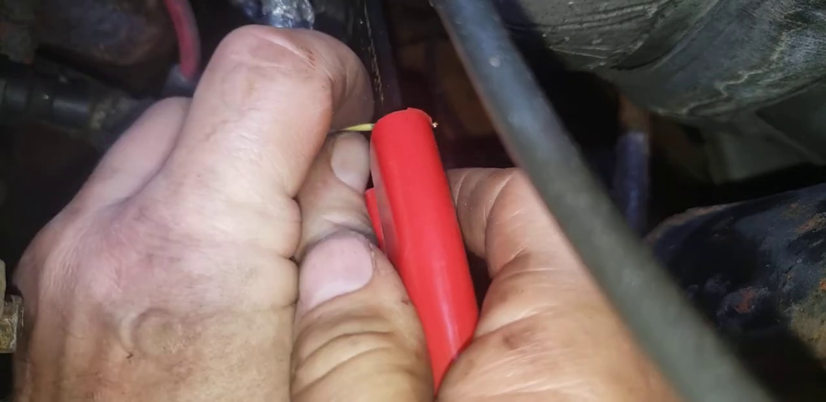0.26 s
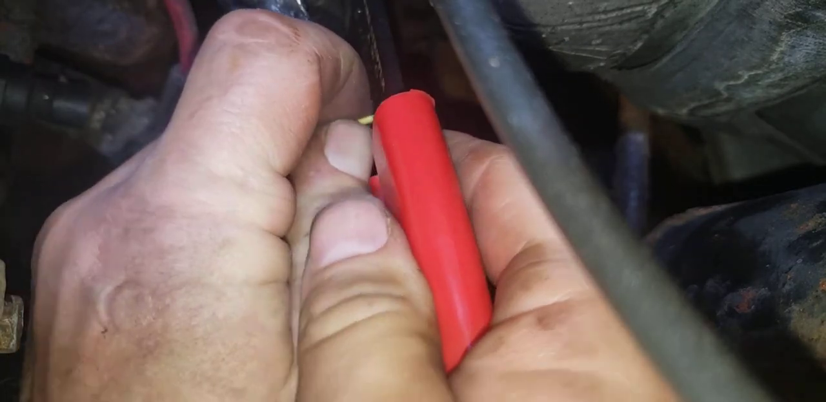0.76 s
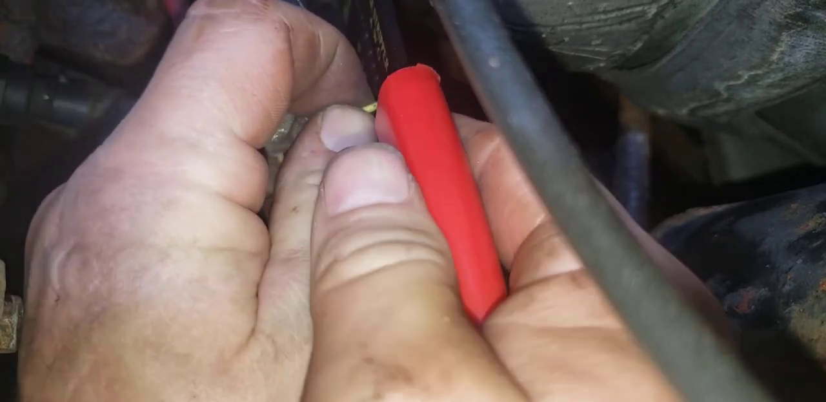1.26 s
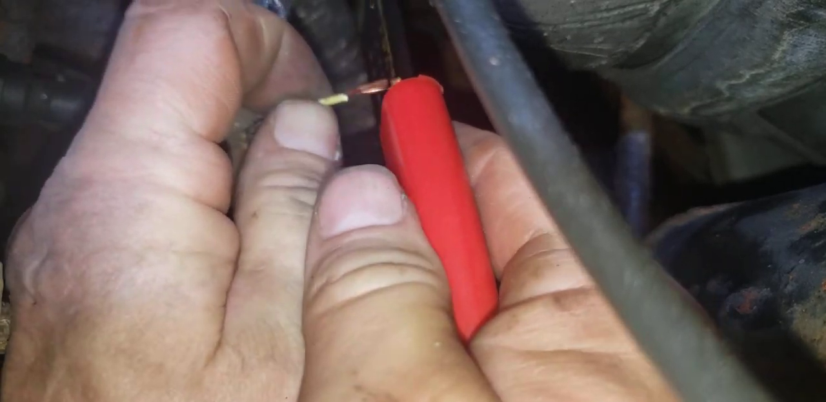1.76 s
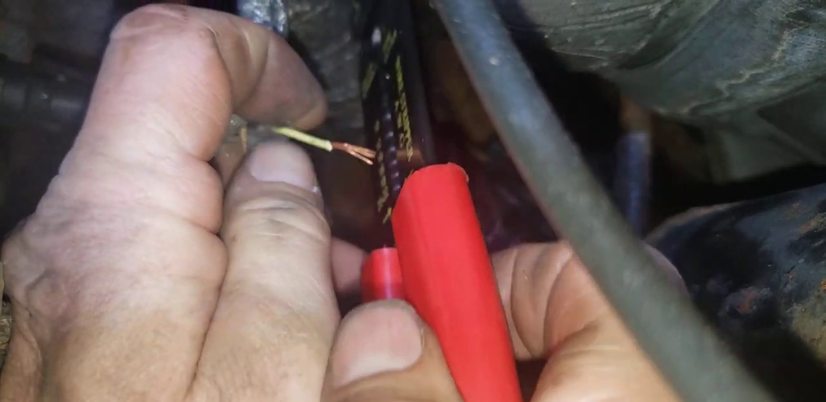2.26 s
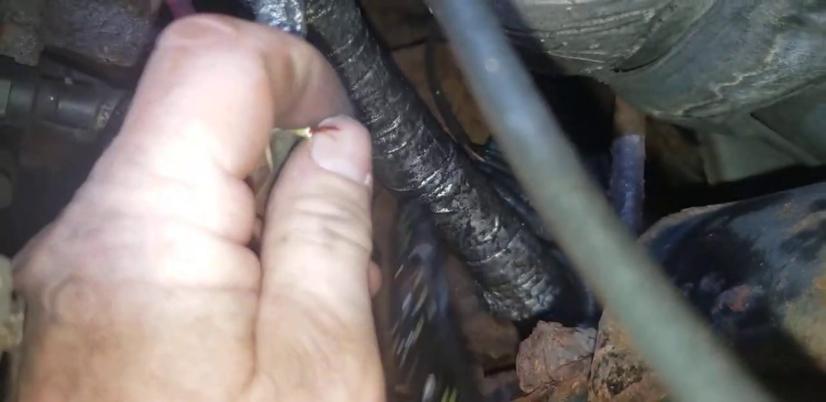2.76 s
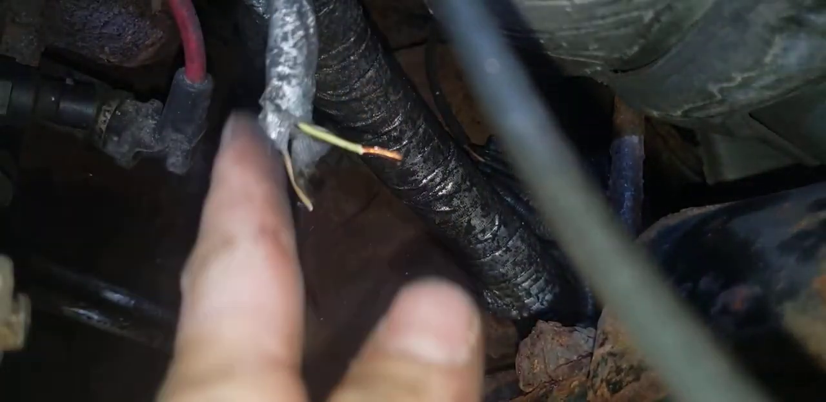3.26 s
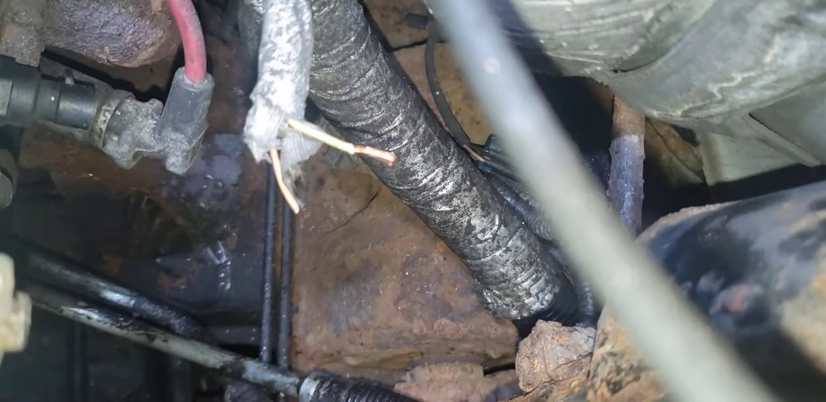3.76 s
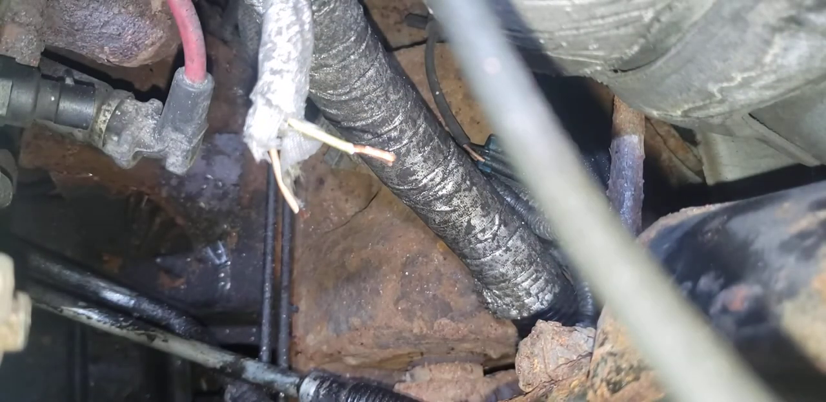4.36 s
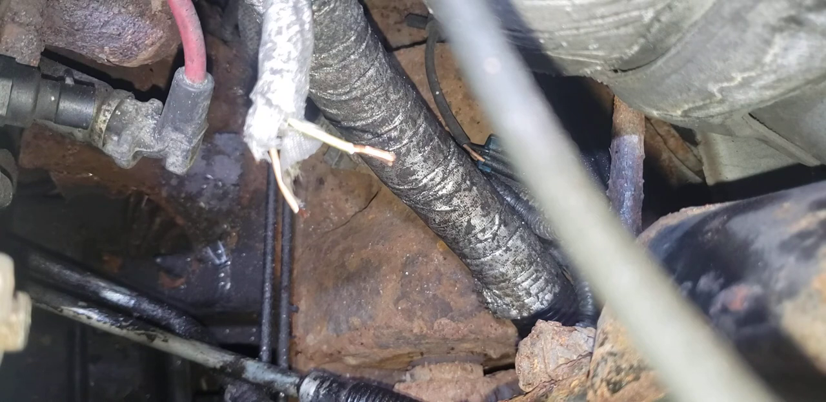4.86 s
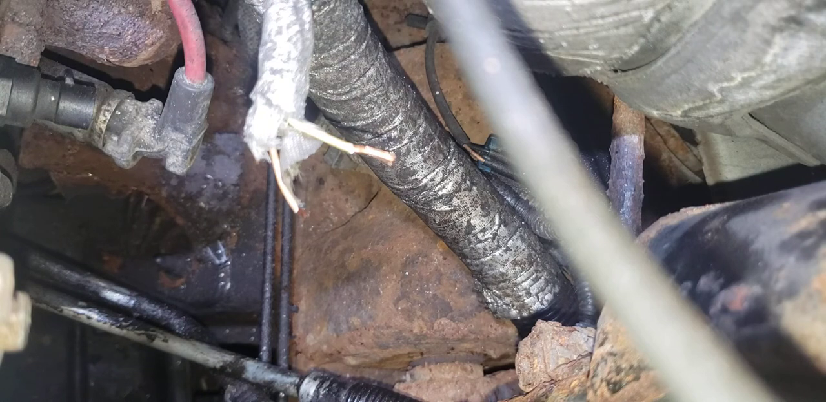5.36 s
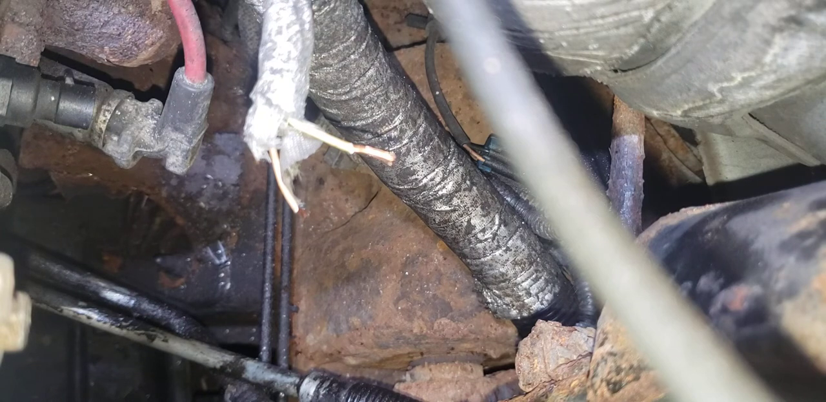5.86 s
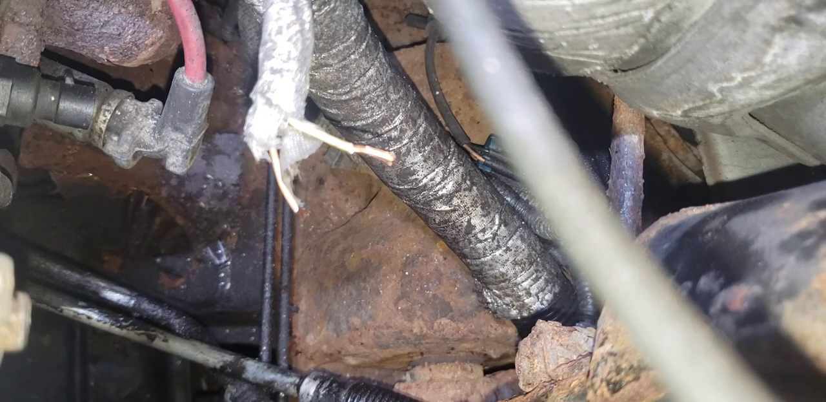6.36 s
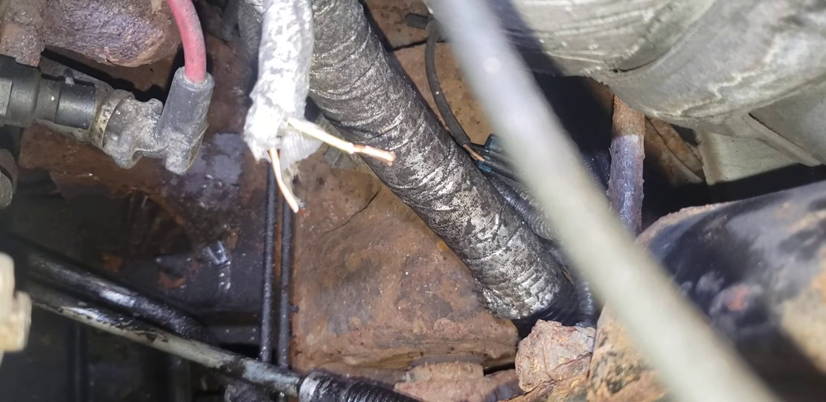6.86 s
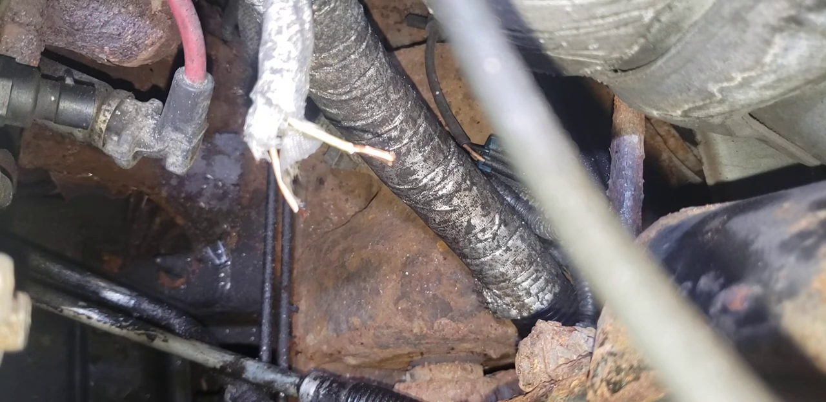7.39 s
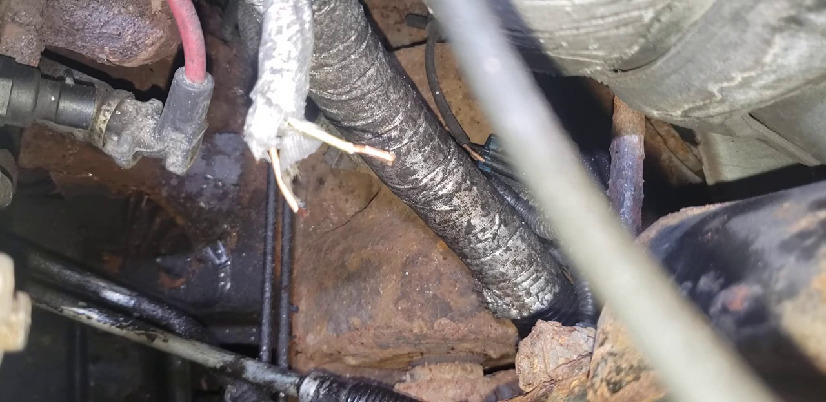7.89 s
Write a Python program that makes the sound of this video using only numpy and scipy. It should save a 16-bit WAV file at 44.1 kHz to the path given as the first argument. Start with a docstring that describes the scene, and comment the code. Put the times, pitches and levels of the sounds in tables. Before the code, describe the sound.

Close, gritty scrapes and sharp little snaps as a tool strips a thin wire, then skin brushing, light ticks and a few hard knocks over low rumble.

```python
"""Stripping a wire in an engine bay

A hand wire stripper bites a thin wire and drags the insulation off, close by: uneven slips, sharp catches
and a few rubbery squeaks. The hand brushes away with airy noise, over low soft thumps and a hollow drone.
Small ticks and a few knocks come from the right as the tool is put down: short noise bursts, the knocks
with ringing tones. A low rumble and a faint hiss, both filtered noise, fill the garage."""
import sys
import numpy as np
from scipy import signal
from scipy.io import wavfile
from scipy.ndimage import uniform_filter1d

SR = 44100
rng = np.random.default_rng(int(sys.argv[2]) if len(sys.argv) > 2 else 0)


def persist_wave(psi):
    """Save psi, clipped to +-1, as 16-bit WAV."""
    counts = np.round(np.clip(psi, -1, 1) * 32767).astype(np.int16)
    wavfile.write(sys.argv[1], SR, np.atleast_2d(counts).T)


N = 358533

# bass, middle and treble: (lowest f/Hz, highest f/Hz)
BANDS = [(110, 900), (900, 7000), (7000, 17000)]
# tone colour of the jaws on the insulation: (f/Hz, left level/dB, right level/dB)
SCRAPE_COLOUR = [(146, 8.5, -17), (318, -1, 2), (433, -5.5, -5), (565, -1.5, 1), (833, -8.5, -10),
                 (1260, -5.5, -8), (1740, -10.5, -7.5), (3100, -15.5, -18), (3900, -21, -12),
                 (4450, -11, -17.5), (5160, -25.5, -11), (7000, -25.5, -30.5), (8330, -20.5, -31.5),
                 (15700, -22.5, -30.5)]
TIME = np.arange(N) / SR
RING_TIME = TIME[:SR // 3]


def amp(db):
    """Turns decibels into gain."""
    return 10 ** (np.asarray(db) / 20)


def evened(x):
    """Scales a sound to rms 1."""
    return x / np.sqrt(np.mean(x ** 2) + 1e-20)


def packed(x):
    """Scales a blow to the energy of 20 ms at rms 1."""
    return evened(x) * np.sqrt(SR / 50 / x.shape[-1])


def add(mix, s, sound):
    """Mixes a stereo sound in at time s."""
    part = mix[:, max(round(s * SR), 0):][:, :sound.shape[1]]
    part += sound[:, :part.shape[1]]


def read(points, hz):
    """Reads the left and right dB of a colour at the given frequencies."""
    f, *sides = np.transpose(points)
    return np.array([np.interp(np.log(hz + 1), np.log(f + 1), side) for side in sides])


def level(curve):
    """Gain along a level curve, practically silent outside it."""
    s, db = np.transpose(curve)
    return amp(np.interp(TIME, s, db, left=-120, right=-120))


def band(x, edges, order=3):
    """Keeps the frequencies between two edges, without looking ahead in time."""
    return signal.sosfilt(signal.butter(order, edges, "band", fs=SR, output="sos"), x)


def coloured(x, points, peaks=(), size=4096):
    """Gives a sound a left and a right spectrum, lifted at narrow resonances."""
    hz = abs(np.fft.fftfreq(size, 1 / SR))
    lifts = sum(lift / (1 + (2 * (hz - f) / width) ** 2) for f, width, lift in peaks)
    db = read(points, hz) + lifts
    # minimum phase: the filter responds as early as it can
    response = np.exp(np.conj(signal.hilbert(np.log(amp(db)))))
    taps = np.fft.ifft(response).real[:, :size // 2]
    return signal.oaconvolve(x, taps, axes=1)[:, :x.shape[1]]


def resonate(x, hz, width):
    """Passes a sound through one fixed resonance."""
    return signal.lfilter(*signal.iirpeak(hz, hz / width, SR), x)


def pair(length, same):
    """Left and right noise; same is how alike they are, from 0 to 1."""
    a, b = rng.standard_normal((2, length))
    same = np.clip(same, -1, 1)
    return np.array([a, same * a + np.sqrt(1 - same ** 2) * b])


def drift(seconds):
    """A smooth random wander of rms 1."""
    width = max(int(seconds * SR), 2)
    once = uniform_filter1d(rng.standard_normal(N), width)
    return evened(uniform_filter1d(once, width))


def stroke(s, hold, attack, release):
    """Gain of one rubbing movement: it swells up to time s, holds, and dies away."""
    fallen = np.maximum((s - TIME) / attack, (TIME - s - hold) / release)
    return np.exp(-np.clip(fallen, 0, 20))


def fading_noise(t, same, rise, t60):
    """Noise that swells over rise seconds while fading by 60 dB every t60 seconds."""
    return pair(len(t), same) * (1 - np.exp(-t / rise)) * np.exp(-np.log(1000) * t / t60)


def blow(levels_db, ring_hz, colour, t60s, rises, same, ring_width, ring_db):
    """A contact scattered by the crowded bay: three bands, each with its own swell and fade, and a pitch."""
    out = 0
    for edges, db, t60, rise, alike in zip(BANDS, levels_db, t60s, rises, same):
        scatter = fading_noise(RING_TIME, alike, rise, t60)
        scatter = scatter + amp(ring_db) * resonate(scatter, ring_hz, ring_width)
        out = out + amp(db) * packed(band(coloured(scatter, colour), edges))
    return out


def crackle(pitches, slips_per_s, same):
    """Many contact spots slip at random, each with its own pitch, echoes and busy moments."""
    t, out = RING_TIME[:SR // 100], 0
    busy = drift(.02)
    for hz in pitches:
        at = np.flatnonzero(rng.random(N) < slips_per_s / len(pitches) / SR)
        sign = rng.choice([-1, 1], len(at))
        size = np.minimum(rng.exponential(1, len(at)), 3)
        # every spot follows the same busy and idle moments, shifted in time
        busy_here = busy[at - rng.integers(N)]
        slips = np.zeros(N)
        slips[at] = sign * amp(2.5 * size + 3 * busy_here)
        echoes = pair(len(t), same) * np.exp(-t / .0013)
        grain = evened(echoes + 3 * resonate(echoes, hz, hz / 5))
        out = out + signal.oaconvolve(slips[None], grain, axes=1)[:, :N]
    return evened(out)


def scrape(slips_per_s=1700, body_db=-2.0, treble_db=-2, same=0.35, low_hz=330):
    """The insulation sticks and slips in the jaws: clumps of uneven slips over a faint smooth rub."""
    # resonances of the tool and the gap between the hands: (f/Hz, width/Hz, lift/dB)
    jaw_peaks = [(602.3, 39, 6), (1281, 27, 9), (1604, 147, 8), (1996, 71, 8.5), (2595, 114, 10),
                 (3110, 54, 13), (4160, 47, 11), (4720, 57, 10.5), (5220, 50, 9), (8830, 300, 7)]
    # strokes of the jaws: short bites have sharp edges, twists swell slowly, the last drags hold
    # (t/s, hold/s, level/dB before body_db, treble against that level/dB before treble_db, edge/s)
    pulls = [(0.1, .018, -65, 14.5, .002), (0.1172, 0.0017, -29, -10, 0.0029),
             (0.365, 0.015, -43, -9.5, 0.0092), (0.537, .012, -43.5, -14, .002),
             (0.556, 0.028, -39.5, -11, 0.0067), (0.603, 0.014, -46, -10, 0.012),
             (0.821, 0.014, -39, -11.5, 0.035), (0.899, .012, -44.5, -12, 0.0016),
             (1.002, 0.03, -46.5, -5.5, 0.0054), (1.048, 0.0077, -38, -10, .012),
             (1.128, 0.014, -58.5, -17, .008), (1.251, 0.029, -44.5, -6.5, .025),
             (1.414, 0.025, -48, -3.5, 0.023), (1.6, 0.033, -42, -9, 0.015),
             (1.632, 0.011, -29.5, -12.5, 0.0084), (1.643, 0.028, -37, -9, 0.028),
             (1.75, 0.027, -41.5, -12, 0.006), (1.832, .1, -46.5, -10, 0.045),
             (1.917, 0.021, -40.5, -12.5, 0.026), (2.018, 0.024, -40, -17, 0.011),
             (2.051, 0.028, -40, -8.5, 0.0012), (2.083, 0.14, -54.5, -10, 0.012),
             (2.196, .13, -45, -8.5, .007), (2.344, 0.11, -42, -9, 0.0084),
             (2.445, 0.039, -37.5, -6, 0.0061)]
    let_go_s = 0.0026  # a stroke's dying away takes this much longer than its swell
    # the grip creaks faintly for as long as the tool is on the wire
    grip_until_s, grip_fade_s = 2.58, 0.035
    grip_db, grip_treble_db = -70, -2.5  # before body_db and treble_db; treble is against the grip

    drive = crackle(np.geomspace(600, 9000, 16), slips_per_s, same) + .5 * pair(N, same)
    rub = coloured(drive, SCRAPE_COLOUR, jaw_peaks)
    body = band(rub, (low_hz, BANDS[1][1])) / np.std(band(rub, BANDS[1]))
    treble = evened(band(rub, BANDS[2]))
    force = amp(grip_db) * stroke(0, grip_until_s, grip_fade_s, grip_fade_s)
    bright = amp(grip_treble_db) * force
    # the strongest movement of the moment sets the level
    for s, hold, db, bright_db, edge in pulls:
        pull = amp(db) * stroke(s, hold, edge, edge + let_go_s)
        force = np.maximum(force, pull)
        bright = np.maximum(bright, amp(bright_db) * pull)
    return amp(body_db) * force * body + amp(treble_db) * bright * treble


def snaps(gain_db=-1):
    """The jaws catch and let go: short noise bursts with a strong pitch of contact."""
    # (t/s, level/dB before gain_db, bass and treble against that level/dB, pitch of the contact f/Hz)
    catches = [(0.092, -49.5, -2, -9, 4300), (0.1148, -46, -13, 3, 1770), (0.1173, -56, 11, -12, 1900),
               (0.5512, -36.5, 1.5, -16, 1620), (0.579, -43, 3.5, -26, 1385), (0.613, -48, 2, -19, 1520),
               (0.897, -50, -2, -20, 2580), (1.006, -51, -16, 7, 5000), (1.627, -32.5, -6, -9.5, 1620),
               (1.6388, -42.5, 12.5, -13, 1290), (1.752, -53.5, 7, 8, 1620), (1.809, -48, 4, -31, 1540),
               (1.919, -40, -6, -13, 1380), (1.942, -54, 15, 4, 1420), (2.054, -38, 0.5, -5, 1320),
               (2.269, -51.5, 7, 3.5, 2730), (2.288, -55, 9.5, 8.5, 5800), (2.361, -48, 3, -11, 2100),
               (2.4543, -49, 13.5, 6.5, 5740), (2.487, -44.5, 5, -16, 2640)]
    t60s, rises_s, same = (.07, .04, .025), (.0012, .0006, .0004), (.8, .3, .2)  # bass, middle, treble
    out = np.zeros((2, N))
    for s, db, bass_db, treble_db, ring_hz in catches:
        levels_db = (db + bass_db, db, db + treble_db)
        catch = blow(levels_db, ring_hz, SCRAPE_COLOUR, t60s, rises_s, same, ring_width=60, ring_db=19.0)
        add(out, s, catch)
    return amp(gain_db) * out


def squeak(overtones=((1, 0), (1.45, -8), (2, -15), (2.7, -25)), sag_per_s=6):
    """The sleeve slides off in a few rubbery slips, each sagging in pitch; overtones: (ratio, level/dB)."""
    # slips of the sleeve as it leaves the strands:
    # (t/s, lowest tone's peak level on the left/dB, its mid-slip pitch f/Hz, time from peak to 1/e/s)
    slips = [(1.7076, -34.5, 630, 0.0026), (1.718, -22.5, 628, 0.0051), (1.727, -35, 585, 0.0065)]
    out = np.zeros(N)
    for s, db, hz, length in slips:
        t = TIME - s
        turns = hz * (t - sag_per_s * t ** 2 / 2)
        tone = sum(amp(part_db) * np.cos(2 * np.pi * ratio * turns) for ratio, part_db in overtones)
        out += amp(db) * tone * np.exp(-(t / length) ** 2)
    return amp([[0], [-1]]) * out  # left and right


def brush(gain_db=1, rough_db=0.8, low_hz=1700):
    """The hand slides off the cable loom: skin friction makes a soft, airy hiss."""
    # tone colour of skin on the loom: (f/Hz, left level/dB, right level/dB)
    skin_colour = [(656, 4.5, 10.5), (1060, -11, -20), (2220, -15, -7), (3170, -15, -7), (5270, -15, 0.5),
                   (6000, -15, -1.5), (6950, -18.5, -17), (9000, -10.5, -15.5), (13100, -10.5, -10),
                   (15800, -11.5, -22)]
    # slides that gather speed until the hand slips off:
    # (t at full speed/s, hold/s, level/dB before gain_db, swell/s)
    slides = [(2.76, 0.14, -73.5, 0.024), (3.258, 0.2, -44.5, .16), (3.533, 0.31, -69.5, .02)]
    slip_off_s = 0.016
    hiss = evened(band(coloured(pair(N, 0), skin_colour), (low_hz, BANDS[2][1]), order=2))
    speed = sum(amp(db) * stroke(s, hold, swell, slip_off_s) for s, hold, db, swell in slides)
    return amp(gain_db + rough_db * drift(0.0044)) * speed * hiss


def ticks(ring_db=2, rise_s=0.0029, ring_width_hz=600, detune=0.028):
    """Light handling of one small part: bright ticks from the right, each at a slightly different pitch."""
    # tone colour of the small part: (f/Hz, left level/dB, right level/dB)
    part_colour = [(203, -2.5, -1), (483, -5.5, -3.5), (780, -25, -12), (1220, -13.5, -8), (1600, -6, -8.5),
                   (2070, -13, 0.5), (3060, -20, -7.5), (3470, -17, -4), (4410, -16, 0.5), (5800, -25, -2),
                   (5710, -24, -0.5), (7660, -24.5, -23.5), (10200, -19.5, -23.5), (15600, -38, -29)]
    # light contacts: (t/s, level/dB, treble against that level/dB)
    contacts = [(2.7737, -59, 0), (3.513, -48, -7), (3.559, -59, -9), (3.5858, -50.5, -5.5),
                (3.6759, -49.5, -4.5), (3.745, -49.5, -6.5), (3.8146, -51.5, -11), (3.9381, -51.5, -12),
                (4.298, -49.5, -9), (4.378, -49, -11), (4.468, -50, -8), (4.488, -56, 2),
                (4.567, -50, -3.5), (4.626, -47, -14), (4.666, -48.5, -10), (4.779, -52.5, -5.5),
                (4.852, -49.5, -6.5), (5.059, -52, -12), (5.1701, -55.5, -19), (5.994, -54, -16),
                (6.206, -61.5, -12), (6.2722, -57, -10.5), (6.4187, -56.5, -6), (6.694, -56.5, -25),
                (7.606, -72, 1), (7.9853, -45, -10.5)]
    tick_hz, bass_db = 4970, -4.5  # the part's ring before detuning, and its thud against the tick
    t60s, rises_s, same = (.11, .055, .045), (.004, rise_s, rise_s / 2), (.8, .1, .1)
    out = np.zeros((2, N))
    for s, db, treble_db in contacts:
        levels_db = (db + bass_db, db, db + treble_db)
        ring_hz = tick_hz * (1 + detune * rng.uniform(-1, 1))
        add(out, s, blow(levels_db, ring_hz, part_colour, t60s, rises_s, same, ring_width_hz, ring_db))
    return out


def knocks(clatter_db=-2, panel_db=-4, duller_db=-6):
    """Each landing of the tool clatters and rings the panel; the right side hears more of it."""
    # tone colour of the landings: (f/Hz, left level/dB, right level/dB)
    knock_colour = [(88, -19, -13.5), (230, -9.5, -9.5), (345, -8.5, -4.5), (520, -14.5, -6.5),
                    (750, -6, -8.5), (960, -38, -10.5), (1250, -10.5, -5), (2050, -9.5, -3),
                    (3100, -11.5, -1.5), (3760, -11.5, -6), (5000, -26, -3), (7900, -30.5, -33.5),
                    (9200, -24.5, -28.5), (15400, -44.5, -46)]
    # the tool lands and settles, levels before clatter_db and panel_db:
    # (t/s, bass level/dB, middle level/dB, treble level/dB, pitch of the contact f/Hz)
    landings = [(6.971, -22.5, -29.5, -56, 2170), (6.99, -31.5, -36.5, -54, 2680),
                (7.008, -39.5, -40, -60, 1260), (7.214, -20.5, -17.5, -23, 5050),
                (7.363, -44, -41, -34, 5700), (7.3988, -32, -39, -40, 4970), (7.408, -46, -37, -42, 4200),
                (7.4607, -36, -41, -49, 4840)]
    # ringing modes of the panel: (f/Hz, relative level/dB, time to fade by 60 dB/s)
    panel = [(223.5, 4, 0.17), (336.8, -2.5, 0.36), (608.3, -1.5, 0.2), (762, -6.5, 0.094),
             (1095, 4.5, 0.092), (1257, -1, 0.093), (1728, 0, 0.081), (2050, -1, 0.092), (1975, -6, .065),
             (2440, -19, .06), (2840, -2, .05), (3630, -2, 0.11), (3680, -4.5, .035), (4630, -6, 0.029),
             (4670, 8, .04), (5760, -3.5, .04)]
    t60s, rises_s, same = (.15, .045, .035), (.005, .0003, .0002), (.7, .1, .1)  # bass, middle, treble

    out, t = np.zeros((2, N)), RING_TIME
    hz, mode_db, mode_t60 = np.transpose(panel)
    sides_db = read(knock_colour, hz)
    sides = amp(sides_db - sides_db.max(0))
    # low modes take longer to build up
    swing = (1 - np.exp(-np.outer(hz, t) / 2)) * np.exp(-np.log(1000) * t / mode_t60[:, None])
    for s, *levels_db, ring_hz in landings:
        # a softer contact hardly reaches the modes above its own pitch (dB an octave)
        reach_db = duller_db * np.maximum(np.log2(hz / ring_hz), 0)
        strike_db = np.where(hz < BANDS[0][1], levels_db[0], levels_db[1])
        force = amp(mode_db + reach_db + strike_db)
        turns = np.outer(hz, t) + rng.random((len(hz), 1))
        ring = (sides * force) @ (swing * np.sin(2 * np.pi * turns))
        clatter = blow(levels_db, ring_hz, knock_colour, t60s, rises_s, same, ring_width=530, ring_db=6)
        add(out, s, amp(clatter_db) * clatter + amp(panel_db) * ring)
    return out


def thumps():
    """Low soft thumps, some under a snap or tick: resonant noise makes a hollow push with no click."""
    # the thumps: (t/s, level/dB, f/Hz, width/Hz, time for the push to fade by 60 dB/s)
    pushes = [(0.117, -34, 181, 257, 0.11), (0.118, -43.5, 606, 248, 0.025), (2.46, -39, 350, 201, 0.18),
              (2.637, -50.5, 297, 200, 0.2), (4.557, -36, 226, 170, 0.22), (4.562, -48, 496, 180, 0.15),
              (4.626, -45, 480, 221, 0.12), (5.061, -47.5, 468, 380, 0.14), (5.872, -45.5, 535, 71, 0.17),
              (5.946, -38, 347, 198, 0.22), (5.944, -51, 606, 284, 0.099), (7.435, -32.5, 394, 231, 0.23)]
    out = np.zeros((2, N))
    for s, db, hz, width, t60 in pushes:
        push = fading_noise(RING_TIME, 0.53, 0.0023, t60)
        add(out, s, amp(db) * packed(resonate(resonate(push, hz, width), hz, width)))
    return out


def hollow(gain_db=-3):
    """The moving arm rubs and stirs the low resonances of the bay into a hollow drone."""
    # low resonances of the bay: (f/Hz, width/Hz, relative level/dB)
    cavity = [(332.4, 38, -0.5), (442, 46, -9), (575, 34, -17.5), (723, 68, -29.5)]
    # movements of the arm: (t/s, hold/s, level/dB before gain_db)
    rubs = [(2.858, 0.0084, -42.5), (2.969, 0.061, -43.5), (3.34, 0.049, -46.5), (3.447, 0.088, -47.5),
            (3.66, 0.433, -50.5), (4.248, 0.16, -54.5)]
    edge_s = .028
    rub = pair(N, 0.83)
    hum = sum(amp(db) * evened(resonate(resonate(rub, hz, width), hz, width)) for hz, width, db in cavity)
    force = sum(amp(db) * stroke(s, hold, edge_s, edge_s) for s, hold, db in rubs)
    return amp(gain_db) * force * evened(hum)


def room(x, t60s=(.45, .22, .18), wet_db=(-17, -28, -29)):
    """A faint tail from the garage walls: fading noise stands in for the many reflections."""
    echo = 0
    for edges, t60, db in zip(BANDS, t60s, wet_db):
        tail = fading_noise(RING_TIME, 0.24, 0.01, t60)
        echo = echo + amp(db) * band(tail / np.linalg.norm(tail[0]), edges)
    return signal.fftconvolve(x, echo, axes=1)[:, :N]


def garage(rumble_db=-49, swell_db=1):
    """A gently wavering rumble, nearly mono in the bass, under a growing hiss; all are filtered noise."""
    # tone colours of the rumble and the hiss: (f/Hz, left level/dB, right level/dB)
    rumble_colour = [(20, -37, -19.5), (30, -16, -20), (55, 1, -7), (100, -2.5, -2), (196, -11.5, -14),
                     (426, -25, -21), (690, -50, -41), (1100, -42, -42.5), (1700, -40, -33.5),
                     (3120, -47.5, -58.5), (4540, -55.5, -47), (5140, -52.5, -29.5), (6570, -61.5, -59.5),
                     (10000, -57, -57.5), (14000, -51.5, -51.5)]
    hiss_colour = [(500, 1.5, 1.5), (1050, -16, -10.5), (1740, -3, -0.5), (2430, -19.5, -4),
                   (3480, -32, -13), (5200, -45, -15.5), (6560, -45.5, -25.5), (7000, -58, -71.5),
                   (10000, -33, -52)]
    # the garage's hiss slowly grows: (t/s, level/dB)
    hiss_curve = [(0, -74), (5.2, -74), (5.7, -71.5), (6.5, -64.5), (8.13, -60)]
    # a thin high hiss that comes and goes: (t/s, level/dB)
    sizzle_curve = [(3.9, -91), (4.6, -71.5), (5.55, -80.5), (5.75, -100)]
    near_mono = signal.sosfilt(signal.butter(1, 500, fs=SR, output="sos"), pair(N, 0.96))
    apart = signal.sosfilt(signal.butter(1, 500, "high", fs=SR, output="sos"), pair(N, 0.065))
    rumble = evened(coloured(near_mono + apart + 0.075 * pair(N, 0), rumble_colour, size=16384))
    hiss = evened(band(coloured(pair(N, .1), hiss_colour), (600, 15000)))
    sizzle = evened(band(pair(N, 0), (12000, 15000), order=2))
    rumble = amp(rumble_db + swell_db * drift(0.15)) * rumble
    return rumble + level(hiss_curve) * hiss + level(sizzle_curve) * sizzle


def scene():
    """All handling sounds with their tail, in the garage."""
    handling = scrape() + snaps() + squeak() + brush() + ticks() + knocks() + thumps() + hollow()
    return handling + room(handling) + garage()


def record(dry):
    """A steep low-pass takes away the highest treble."""
    edge_hz = 16200
    taps = signal.firwin(301, edge_hz, window=("kaiser", 8), fs=SR)
    return signal.oaconvolve(dry, taps[None], "same", axes=1)


dry = scene()
out = record(dry)
persist_wave(out)
```